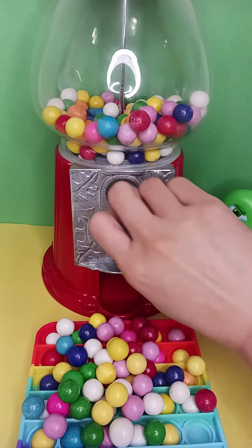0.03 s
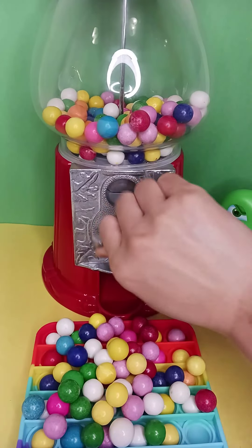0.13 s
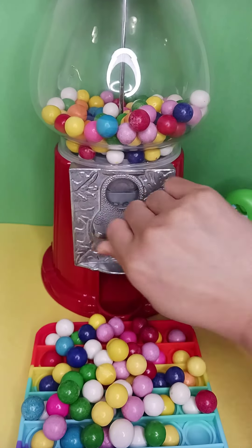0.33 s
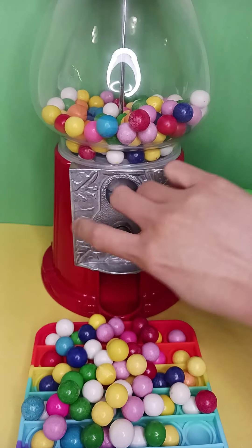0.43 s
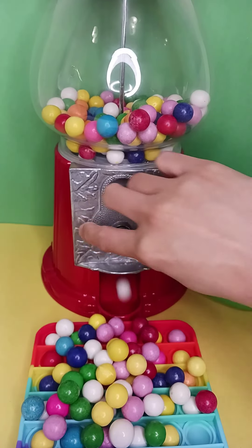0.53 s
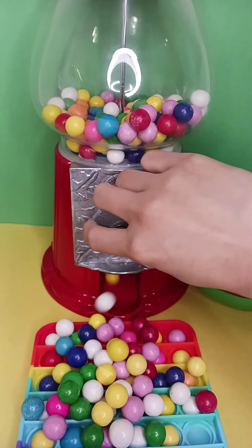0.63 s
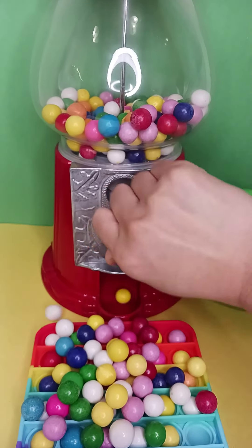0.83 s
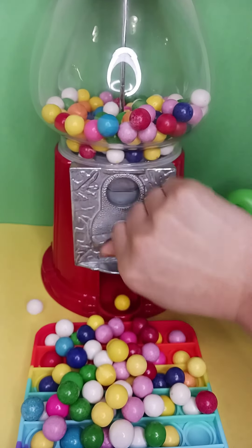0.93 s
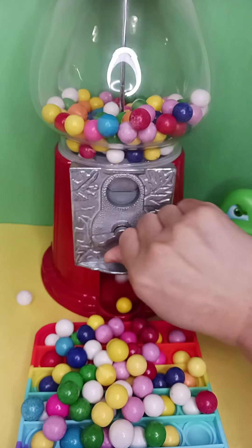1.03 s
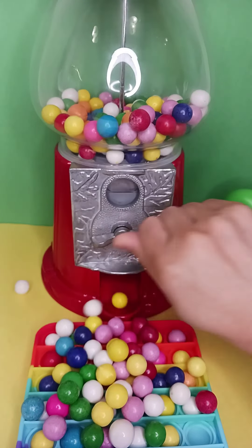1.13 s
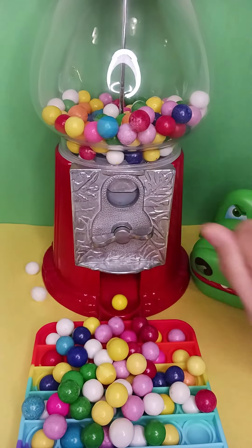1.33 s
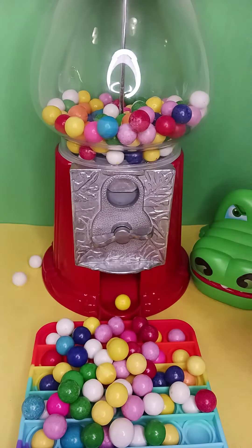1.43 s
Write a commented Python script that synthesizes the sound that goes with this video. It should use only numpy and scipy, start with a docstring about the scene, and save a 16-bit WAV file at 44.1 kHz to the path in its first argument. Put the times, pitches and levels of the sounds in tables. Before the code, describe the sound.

Hard metallic ratcheting of a small candy dispenser's knob, with rattles, thuds and a final tick

```python
"""Crank of a gumball machine

A hand turns the metal crank on a table, close to a two-port microphone. Pawl and coin wheel clack in
bursts of micro-impacts that ring the cast front plate; random ticks make loose parts and gumballs rattle.
Some blows thud through the table, strongest at the right port, as sines sinking in pitch; the table also
shakes and rumbles as filtered noise. Near the end a gumball bounces on the plastic tray: ticks and short
modes. A small room answers, over a faint noise floor."""
import sys
import numpy as np
from scipy import signal
from scipy.fft import rfft, irfft
from scipy.io import wavfile
from scipy.ndimage import uniform_filter1d

SR = 44100
rng = np.random.default_rng(int(sys.argv[2]) if len(sys.argv) > 2 else 0)


def file_out(sig):
    """Save sig as 16-bit WAV at sys.argv[1]."""
    # one column per channel
    cols = np.atleast_2d(sig).T
    # limit, then scale
    lim = np.clip(cols, -1, 1)
    pcm = np.round(lim * 32767).astype(np.int16)
    wavfile.write(sys.argv[1], SR, pcm)


N = 66150  # 1.5 s

# steady noise floor, spectrum: [f/Hz, level/dB]
FLOOR_COLOUR = [(30, -4), (60, 0), (160, -3), (400, -16), (1600, -18), (4200, -18), (7000, -28),
                (16000, -34)]
FLOOR_DB = -82

# clacks of pawl and coin wheel: [t/s, level/dB, six band levels at 0.9, 1.8, 3.3, 6, 9.5, 13 kHz/dB,
# left over right before the port colour/dB, chatter decay to 1/e/s, plate ring/dB]
CLACKS = [(0.0325, -40, -19, -11.5, -10, -20, -26.5, -38.5, 4, 0.011, -5.5),
          (0.0661, -38.5, -28, -16.5, -4, -25, -45.5, -42, 6.5, 0.00098, 0.5),
          (0.0777, -35.5, -23.5, -13, -7.5, -15, -22, -20.5, 4.5, 0.0099, -8.5),
          (0.1098, -21, -29, -33, -21.5, -28.5, -37, -29, 13, 0.0033, -2),
          (0.1356, -3, -24.5, -19.5, -12, -16, -19.5, -14, 3.5, 0.0016, -8),
          (0.1415, -11.5, -28, -13, -6, -30.5, -13, -7.5, 4, 0.0014, 4),
          (0.153, -16.5, -30, -21, -10, -15, -10.5, -3.5, 6.5, 0.0027, -17.5),
          (0.1752, -11.5, -32, -16.5, -16, -20, -18, -15, 1, 0.0047, -13),
          (0.1856, -7, -27, -38, -15, -16, -12.5, -11, 6, 0.00093, -4),
          (0.197, -11.5, -33, -18, -11.5, -17, -17, -18, 3.5, 0.011, -19.5),
          (0.2626, -8.5, -36, -20, -21, -9, -20, -13.5, 5.5, 0.0015, -24),
          (0.301, -33.5, -21, -15, 3, -16, 2, -9.5, 7.5, 0.0026, -17),
          (0.325, -26.5, -24, -12, -4.5, -6.5, -13, -6.5, 3.5, 0.023, -9),
          (0.3499, -23.5, -49, -20, -11.5, -30, -11.5, -12, 2.5, 0.0047, -22),
          (0.376, -25, -37, -13.5, -10.5, -10, -15.5, -18.5, 6.5, 0.0015, -14),
          (0.5068, -12.5, -33.5, -21, -13, -21, -15, -7.5, 3.5, 0.006, -10),
          (0.5259, -19, -18, -32, -10.5, -12, -13.5, -10, 7, 0.0025, -8),
          (0.5571, -15, -30, -17, -6.5, -16, -9.5, -13.5, 2.5, 0.005, -3.5),
          (0.5879, -16.5, -34.5, -21.5, -9.5, -15, -12.5, -6.5, 5, 0.0039, -5),
          (0.6084, -11.5, -35.5, -43, -13, -12.5, -16.5, -12, 4, 0.0019, -9),
          (0.6543, -15.5, -36, -21.5, -12, -9, -15, -18, 5, 0.0014, -7.5),
          (0.691, -24.5, -25, -46, -20, -13, -19.5, -20.5, 11, 0.0015, -16),
          (0.7051, -16.5, -37.5, -26, -18.5, -26, -11, -17, 3, 0.0011, -9),
          (0.7166, -23, -44, -19, -12, -18, -14.5, -25.5, 5, 0.0068, -23),
          (0.7265, -8.5, -29.5, -17, -13, -15.5, -16, -10.5, 2, 0.0043, -1.5),
          (0.7432, -16, -22, -24, -8, -28.5, -14.5, -15, 8, 0.0065, -2.5),
          (0.7684, -12, -39, -17, -12.5, -12.5, -14, -7, 5, 0.0021, -22),
          (0.7993, -24, -16, -26.5, -12.5, -20, -12, -13.5, 6, 0.0042, -7),
          (0.8948, -12.5, -35.5, -36, -16, -8.5, -10, -8.5, 1, 0.00099, -10.5),
          (0.9162, -23.5, -32, -21.5, -8.5, -23, -23.5, -20, -0.5, 0.0059, -11),
          (0.925, -17, -12.5, -18, -5.5, -22, -20.5, -20.5, 3, 0.0042, -15.5),
          (0.9307, -5, -21, -15, -11.5, -14, -17, -14, -1, 0.003, -6.5),
          (0.938, -9.5, -29, -33.5, -11.5, -11.5, -10.5, -12, 11, 0.0015, -17.5),
          (0.946, -12.5, -22, -21, -9, -16, -26, -18, 4, 0.0025, -14.5),
          (0.9528, -18, -39.5, -8, -3.5, -15.5, -31.5, -25.5, -1.5, 0.0051, -12.5),
          (0.9754, -19.5, -40.5, -25, -21, -8, -15.5, -10, 2.5, 0.0033, -7.5),
          (1.0049, -21, -25.5, -26, -13, -14, -22, -29, 8.5, 0.033, -8),
          (1.046, -6.5, -33, -17, -12.5, -13.5, -9.5, -13.5, 3, 0.0033, -10.5),
          (1.1021, -20.5, -29, -20.5, -6.5, -15, -12, -20, 7.5, 0.0021, -5),
          (1.1142, -14.5, -42, -28, -10, -14.5, -17.5, -14, 1, 0.0032, -4.5),
          (1.1395, -19.5, -32.5, -36, -8, -13.5, -23, -20, 4, 0.0018, -6),
          (1.1447, -19, -32.5, -29.5, -10.5, -13, -18, -26, 6, 0.0059, -3),
          (1.162, -29.5, -29, -22, -11, -14, -14, -32, 7, 0.0038, -19),
          (1.1827, -46, -34, -9, 3.5, -29, -39, -46, -1, 0.0052, -2),
          (1.1984, -32, -19.5, -24.5, -17.5, -11, -18, -37.5, 7.5, 0.0075, -14),
          (1.21, -34, -38, -18, -8.5, -23, -5.5, -18, 4, 0.0031, -4),
          (1.2348, -31.5, -13, -3, -13.5, -32, -33, -28, 0, 0.00097, -19.5),
          (1.2577, -40, -18, -20, -3.5, -17, -15, -27, 6, 0.0037, -3.5),
          (1.268, -41, -38, -11.5, -6.5, -17.5, -26, -44, -1, 0.016, -16),
          (1.2968, -41.5, -9.5, -24.5, -10, -28.5, -30, -40.5, 8.5, 0.0025, -6),
          (1.3152, -36.5, -24, -12.5, -15.5, -23.5, -26.5, -27, 1, 0.0052, 3)]
# where the level of each clack band holds, one row a band: [f/Hz, ...]
CLACK_BAND_HZ = [
    [780, 1100],
    [1800],
    [2600, 4300],
    [6000],
    [9500],
    [13000],
]
# edges between the clack bands: [f/Hz]
BAND_EDGES_HZ = [600, 1300, 2300, 4600, 8000, 11500, 15000]
CLACK_DB, GRAIN_DB = -0.05, 5
RISE_S, SETTLE_S = 0.0016, 0.0039  # onset, and extra decay once the chatter is two decays old

# clear modes of plate and housing: [f/Hz, level/dB, t60/s]
PLATE_MODES = [(886, 3.5, 0.042), (1643, 4, 0.076), (1685, 9.5, 0.05), (2460, 1.5, 0.018),
               (2708, 10.5, 0.055), (3424, 4.5, 0.04), (4090, 10.5, 0.024), (4080, 4.5, 0.028),
               (5900, -5.5, 0.026), (6260, 1.5, 0.03), (10160, 13, 0.011), (12900, 6, 0.035)]
# dense ring of the housing: [f/Hz, t60/s]
HOUSING_T60 = [(400, .04), (1500, .035), (4000, .03), (9000, .025), (15000, .022)]
RING_VARY_DB, DIRECT_DB = 2.5, -10
DETUNE = 0.009  # spread of mode pitch from stroke to stroke, as a fraction
EVEN_HZ = 500  # chance colour wider than this is ironed out

# rattle of loose parts and gumballs, before the overall level match: [t/s, level/dB]
RATTLE = [(0, -97.5), (.03, -70.5), (.07, -66.5), (.13, -43.5), (.2, -39), (.255, -40.5), (.28, -37),
          (.38, -53), (.42, -59), (.46, -103), (.5, -63), (.54, -40.5), (.65, -71.5), (.72, -36),
          (.8, -35.5), (.885, -50.5), (.96, -33), (1.04, -47.5), (1.16, -55.5), (1.25, -53), (1.33, -70.5),
          (1.37, -101), (1.5, -93)]
# colour of the rattle: [f/Hz, level/dB]
RATTLE_COLOUR = [(180, -27.5), (300, -16), (1320, -7), (1640, -2.5), (2700, 0.5), (2930, 2), (8360, -6.5),
                 (12700, -2.5), (15000, -36), (16000, -32.5)]
RATTLE_PER_S, RATTLE_GRAIN_DB = 800, 3.5
RATTLE_RING_DB = -7.0  # plate modes against the dense ring

# rumble of the table while the crank turns, midway between the ports: [t/s, level/dB]
RUMBLE = [(0.0, -88), (0.104, -71.5), (0.3, -64), (0.46, -97), (0.572, -64), (0.714, -72), (0.76, -52.5),
          (0.88, -69), (0.94, -60.5), (1.052, -61.5), (1.198, -74.5), (1.332, -69.5), (1.5, -100.5)]
# upper resonances of the table: [f/Hz, level/dB]
RUMBLE_COLOUR = [(70, -24.5), (155, 0.5), (220, -8), (290, -5), (450, -28), (1000, -44)]

# thuds through the table, before the port offsets:
# [t/s, push level/dB, table ring level/dB, start pitch f/Hz, end pitch f/Hz]
THUDS = [(0.139, -38.5, -39.5, 463, 142), (.187, -23.5, -43, 914, 65), (.263, -34, -50, 760, 60),
         (0.729, -26, -54, 762, 66), (0.8224, -42, -47, 900, 62), (0.94, -15.5, -39, 880, 64.8),
         (1.047, -40.5, -46, 990, 70), (1.2365, -42, -48.5, 2080, 160), (1.297, -58, -51.5, 1410, 160)]
# modes of the table top: [f/Hz, level/dB, t60/s]
TABLE_MODES = [(62, -8.5, 0.057), (160, 4, 0.2), (270, -6, 0.041)]
PUSH_LEFT_DB, PUSH_RIGHT_DB, TABLE_LEFT_DB = -12.5, 5, 5.5
GLIDE_S, PUSH_T60_S = 0.0014, 0.036
TABLE_VARY_DB, LOW_CUT_HZ = 1.5, 45

# low shake of the table under the hand, before SHAKE_DB and the port offsets: [t/s, level/dB]
SHAKE = [(0.0, -88), (0.066, -77), (0.2, -34), (0.228, -43.5), (0.278, -30), (0.292, -46), (0.32, -65),
         (0.484, -84), (0.546, -59.5), (0.7, -81), (0.726, -36.5), (0.742, -35), (0.788, -47), (0.826, -40),
         (0.898, -48.5), (0.918, -41), (0.952, -34.5), (1.018, -55), (1.23, -67), (1.46, -92)]
SHAKE_HZ, SHAKE_DB = 65, -8
SHAKE_WIDTH_HZ = 12  # of one pass; the resonance is applied twice

# bounces of a gumball on the tray, before DROP_DB: [t/s, level/dB]
DROPS = [(1.407, -31), (1.438, -60.5), (1.46, -48.5), (1.483, -66.5)]
# modes of the plastic tray: [f/Hz, level/dB, t60/s]
TRAY_MODES = [(2060, -15, 0.025), (2600, -14, 0.04), (4460, 3, 0.045), (5150, -1, 0.02), (6180, -11, 0.025),
              (7300, -10, 0.03)]
# colour of the dry tick on the tray: [f/Hz, level/dB]
TRAY_TICK_COLOUR = [(600, -30.5), (2000, -11.5), (5000, -6), (8000, -13), (14000, -25.5)]
TRAY_TICK_DB, DROP_DB = 6, 17.0

# microphone ports: [f/Hz, left over right/dB]
PORTS = [(400, 4), (900, -14), (1600, 1), (2700, -6.5), (4500, -1), (7000, -6.5), (10000, 5), (12500, 4.5),
         (15000, -3.5)]
SAME, LAG_SAMPLES = 0.63, 8  # likeness of the ports, largest shift of arrival between them

# decay of the room: [f/Hz, t60/s]
ROOM_T60 = [(300, 0.12), (2000, .14), (8000, 0.21), (15000, 0.19)]
ROOM_DB = -8.5

FULL_SCALE = 0.95  # the input stage rounds off peaks near this height
ROLL_OFF_HZ, EDGE_HZ = 15200, 16600


def amp(db):
    """Amplitude factor of a level in dB."""
    return 10 ** (np.asarray(db, float) / 20)


def evened(x):
    """Scale to an RMS of 1."""
    return x / np.sqrt(np.mean(x ** 2) + 1e-20)


def read(points, hz):
    """Read a table of points over frequency, straight lines on a log axis."""
    f, value = np.transpose(points)
    return np.interp(np.log(hz + 1), np.log(f + 1), value)


def curve(points):
    """Draw straight lines through points in time, one value a sample."""
    t, value = np.transpose(points)
    return np.interp(np.arange(N) / SR, t, value)


def add(mix, s, sound):
    """Lay a sound into the mix at s seconds."""
    part = mix[..., max(round(s * SR), 0):][..., :sound.shape[-1]]
    part += sound[..., :part.shape[-1]]


def colour(x, points):
    """Minimum-phase filter from (f/Hz, level/dB) points."""
    log_gain = np.log(amp(read(points, abs(np.fft.fftfreq(4096, 1 / SR)))))
    taps = np.fft.ifft(np.exp(np.conj(signal.hilbert(log_gain)))).real[:2048]
    taps = taps.reshape((1,) * (x.ndim - 1) + (-1,))
    return signal.fftconvolve(x, taps, axes=-1)[..., :x.shape[-1]]


def tail(t60s, size, same):
    """Two-port decaying noise, each band dying at its own speed, left port of energy 1."""
    a, b = rng.standard_normal((2, size))
    same = np.clip(same, 0, 1)
    pair = np.array([a, same * a + np.sqrt(1 - same ** 2) * b])
    hz, t, z = signal.stft(pair, SR, nperseg=128)
    t60 = np.maximum(read(t60s, hz), .005)[:, None]
    out = signal.istft(z * amp(-60 * t / t60), SR, nperseg=128)[1]
    return out / np.linalg.norm(out[0])


def ring(modes, size, vary_db=0.):
    """Sum of dying sines, each struck a little differently for each port, scaled to a mean norm of 1."""
    t = np.arange(size) / SR
    hz, db, t60 = np.transpose(modes)[:, :, None]
    luck = rng.standard_normal((4, len(modes), 1))  # shared level, left, right, pitch
    turns = hz * (1 + DETUNE * luck[3]) * t
    ports = []
    for k in (1, 2):
        level_db = db + vary_db * (luck[0] + .5 * luck[k]) - 60 * t / t60
        sines = np.sin(2 * np.pi * turns + luck[k])
        ports.append((amp(level_db) * sines).sum(0))
    out = np.array(ports)
    return out / np.linalg.norm(out, axis=1).mean()


def flattened(x):
    """Irons out the chance colour of a noise burst, keeping its fine grain."""
    z = rfft(x, 2 * len(x))
    width = max(int(EVEN_HZ * 2 * len(x) / SR), 1)
    power = uniform_filter1d(abs(z) ** 2, width)
    return irfft(z / np.sqrt(power + 1e-20))[:len(x)]


def band_db(x):
    """Energy in each clack band in dB, averaged over the ports."""
    power = np.cumsum((abs(rfft(x, 8192)) ** 2).mean(0)) / 4096
    edges = np.array(BAND_EDGES_HZ) * 8192 // SR
    return 10 * np.log10(np.diff(power[edges]) + 1e-20)


def housing(x, ring_db):
    """A blow excites the bare tick, the dense ring of the housing and the clear modes of the plate."""
    dense = tail(HOUSING_T60, 6000, SAME)[:, :6000]
    body = np.array([flattened(port) for port in dense])
    body += amp(ring_db) * ring(PLATE_MODES, 6000, RING_VARY_DB)
    body[:, 0] += amp(DIRECT_DB)
    return signal.fftconvolve(x[None], body, axes=1)


def noise_floor():
    """Steady coloured noise, independent at the two ports."""
    return amp(FLOOR_DB) * evened(colour(rng.standard_normal((2, N)), FLOOR_COLOUR))


def clacks():
    """Each clack: a few milliseconds of micro-impacts that settle, rung by the housing."""
    out, t = np.zeros((2, N)), np.arange(2000) / SR
    for s, db, *bands, pan_db, length, ring_db in CLACKS:
        settling = np.maximum(t - 2 * length, 0) / SETTLE_S
        shape = np.minimum(t / RISE_S, 1) * np.exp(-t / length - settling)
        grain_size = amp(GRAIN_DB * np.minimum(rng.exponential(1, len(t)), 3))
        grains = rng.standard_normal(len(t)) * grain_size
        struck = housing(flattened(shape * grains), ring_db)
        # bring each band to its level, as energy spread over 5 ms
        gains_db = np.array(bands) - band_db(struck) + 10 * np.log10(SR / 200)
        points = [(400, gains_db[0] - 20.5)]
        points += [(f, g) for band, g in zip(CLACK_BAND_HZ, gains_db) for f in band]
        left, right = colour(struck, points)
        lag = round(LAG_SAMPLES * rng.uniform(-1, 1))
        sound = np.array([left, np.roll(right, lag)])
        pan = np.array([[pan_db / 2], [-pan_db / 2]])
        add(out, s, amp(CLACK_DB + db + pan) * sound)
    return out


def rattle():
    """Many small ticks of random size, struck at eight places of the housing."""
    size = amp(RATTLE_GRAIN_DB * np.minimum(rng.exponential(1, N), 4))
    size = size * (rng.random(N) < RATTLE_PER_S / SR)
    ticks = evened(size) * amp(curve(RATTLE))
    place = rng.integers(0, 8, N)
    struck = sum(housing(ticks * (place == k), RATTLE_RING_DB)[:, :N] for k in range(8))
    out = colour(struck, RATTLE_COLOUR)
    return out * np.std(ticks) / np.std(out)


def rumble():
    """Low noise in the table's upper resonances, much alike at both ports and stronger at the right."""
    a, b = rng.standard_normal((2, N))
    noise = evened(colour(np.array([a, 2.7 * a + b]), RUMBLE_COLOUR))
    return noise * amp(curve(RUMBLE) + np.array([[-2.5], [2.5]]))


def thuds():
    """A knock that sinks quickly in pitch, strong at the right port, and sets the table ringing."""
    out, t = np.zeros((2, N)), np.arange(6000) / SR
    push_ports_db = np.array([[PUSH_LEFT_DB], [PUSH_RIGHT_DB]])
    table_ports_db = np.array([[TABLE_LEFT_DB], [0]])
    for s, push_db, ring_db, start_hz, end_hz in THUDS:
        hz = end_hz + (start_hz - end_hz) / (1 + t / GLIDE_S) ** 2
        push = amp(-60 * t / PUSH_T60_S) * np.sin(2 * np.pi * np.cumsum(hz) / SR)
        table = ring(TABLE_MODES, 12000, TABLE_VARY_DB)
        add(out, s, amp(push_db + push_ports_db) * push)
        add(out, s, amp(ring_db + table_ports_db) * table / abs(table).max())
    return signal.lfilter(*signal.butter(2, LOW_CUT_HZ, "high", fs=SR), out)


def shake():
    """The lowest table resonance wobbles in pitch, nearly the same at both ports."""
    a, b = rng.standard_normal((2, N))
    peak = signal.iirpeak(SHAKE_HZ, SHAKE_HZ / SHAKE_WIDTH_HZ, SR)
    low = signal.lfilter(*peak, np.array([a, a + .3 * b]))
    low = signal.lfilter(*peak, low)
    # keep only the phase of the noise, so that the level follows the table alone
    wobble = np.sqrt(2) * np.cos(np.angle(signal.hilbert(low)))
    return wobble * amp(curve(SHAKE) + SHAKE_DB + np.array([[-2.5], [2.5]]))


def drops():
    """Each bounce of the gumball: a dry tick and the short ring of the tray."""
    out = np.zeros((2, N))
    fade_in = np.minimum(np.arange(5000) / 30.0, 1)
    for s, db in DROPS:
        noise = tail([(1000, 0.094), (10000, 0.077)], 5000, SAME)[:, :5000]  # (f/Hz, t60/s)
        tick = amp(TRAY_TICK_DB) * colour(noise, TRAY_TICK_COLOUR)
        add(out, s, amp(db + DROP_DB) * (ring(TRAY_MODES, 5000, 0.45) + tick) * fade_in)
    return out


def room(direct):
    """The room answers with decaying noise, 200 samples after the direct sound."""
    echo = np.pad(tail(ROOM_T60, 16000, 0.91), ((0, 0), (200, 0)))
    return amp(ROOM_DB) * signal.fftconvolve(direct, echo, axes=1)[:, :N]


def scene():
    """Metal through the port colours, thuds and bounces, all in the room; then shake, rumble and floor."""
    metal = clacks() + rattle()
    left = colour(metal[0], [(f, db / 2) for f, db in PORTS])
    right = colour(metal[1], [(f, -db / 2) for f, db in PORTS])
    direct = np.array([left, right]) + thuds() + drops()
    return direct + room(direct) + shake() + rumble() + noise_floor()


def record(dry):
    """Rounded peaks, top-end roll-off, then the band limit."""
    rounded = FULL_SCALE * np.tanh(dry / FULL_SCALE)
    corners_hz = [0, ROLL_OFF_HZ, 15700, EDGE_HZ, SR / 2]
    roll_off = signal.firwin2(255, corners_hz, amp([0, 0, -25, -40, -60]), fs=SR)
    soft = signal.oaconvolve(rounded, roll_off[None], "same")
    band_limit = signal.firwin(511, EDGE_HZ, window=("kaiser", 9), fs=SR)
    return signal.oaconvolve(soft, band_limit[None], "same")


dry = scene()
out = record(dry)
file_out(out)
```